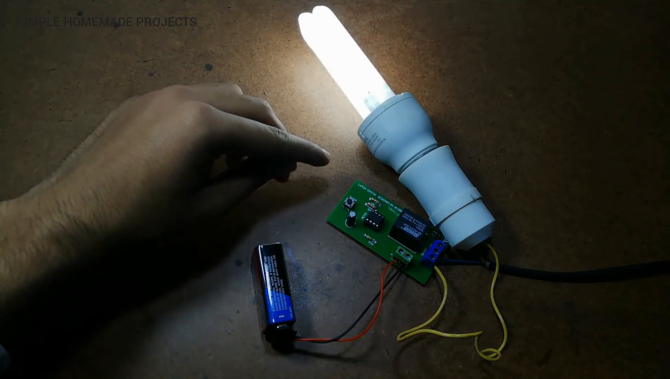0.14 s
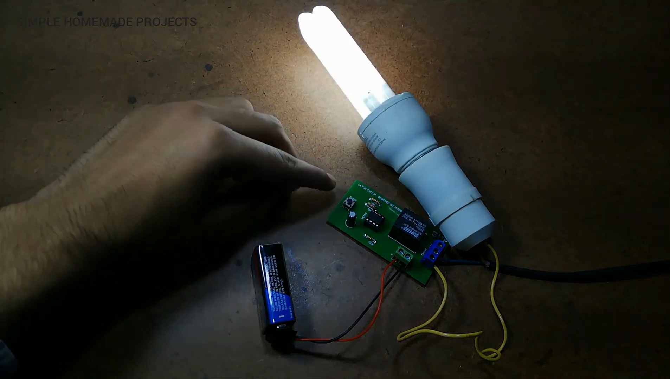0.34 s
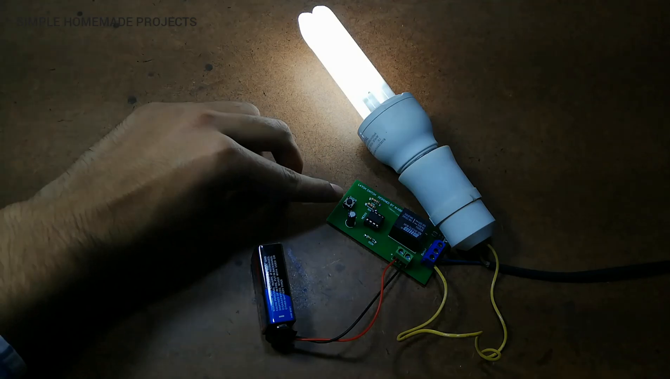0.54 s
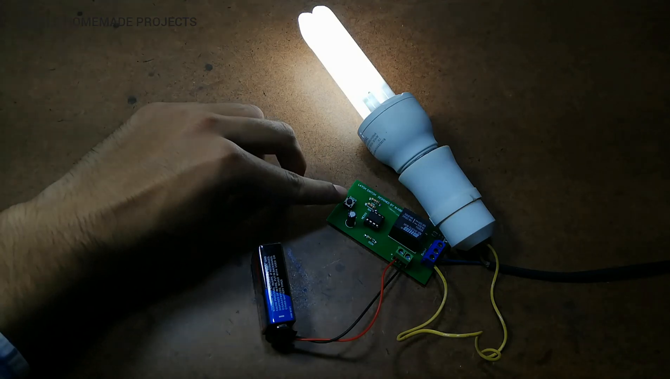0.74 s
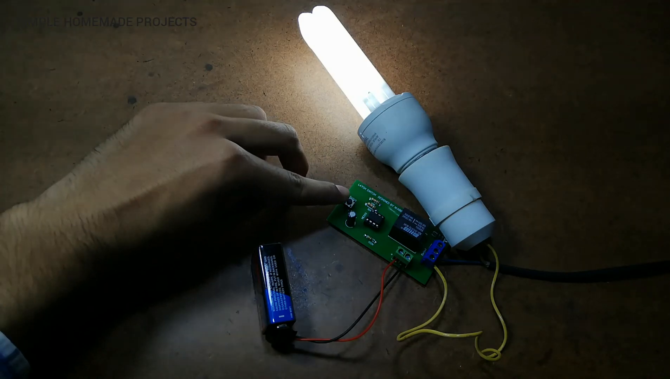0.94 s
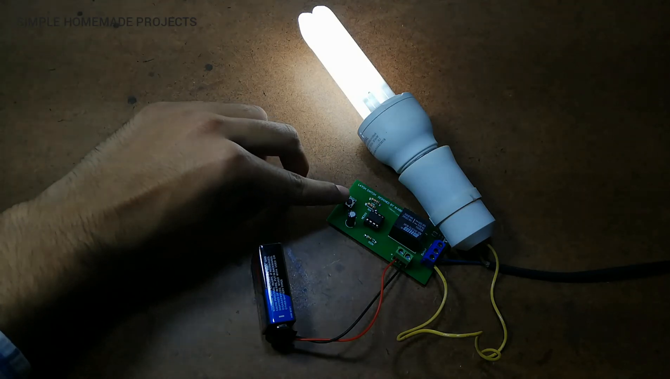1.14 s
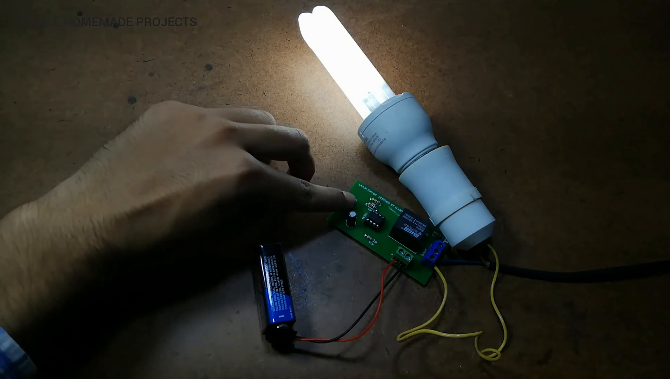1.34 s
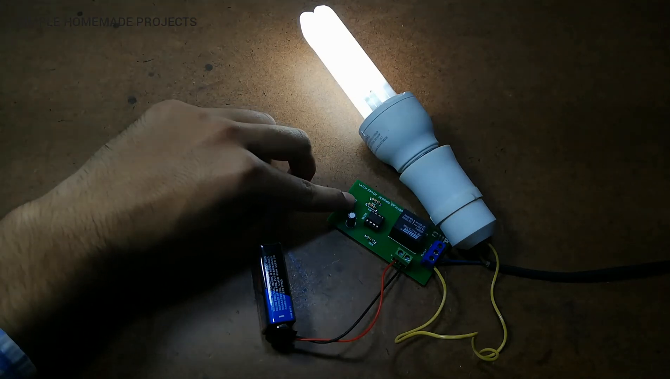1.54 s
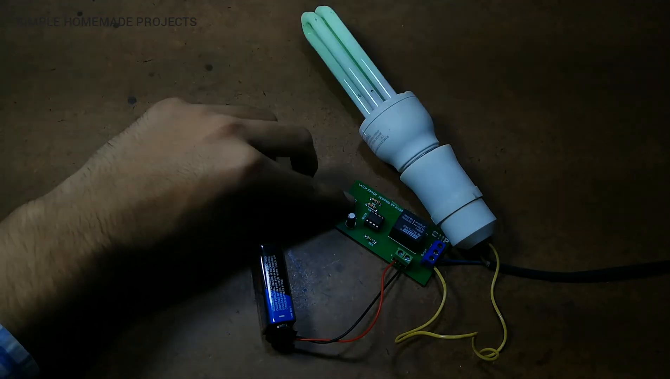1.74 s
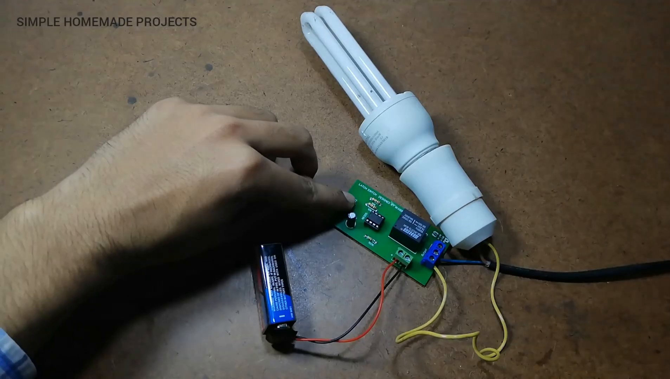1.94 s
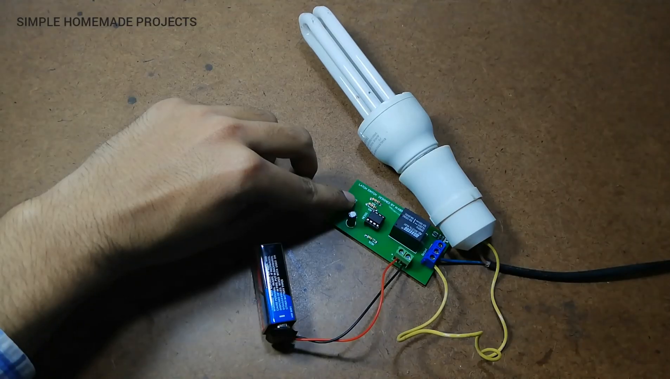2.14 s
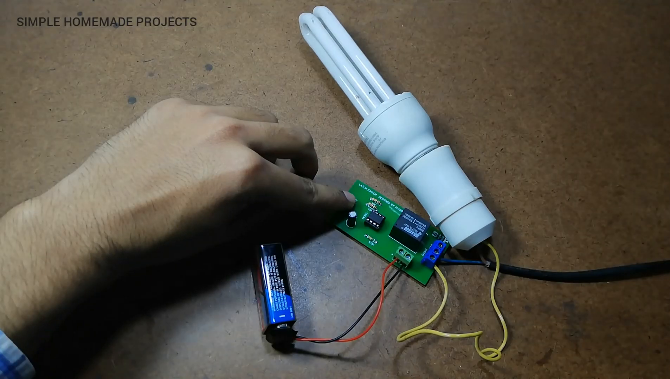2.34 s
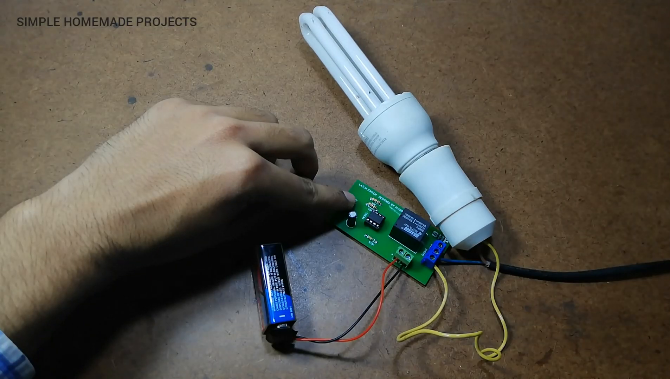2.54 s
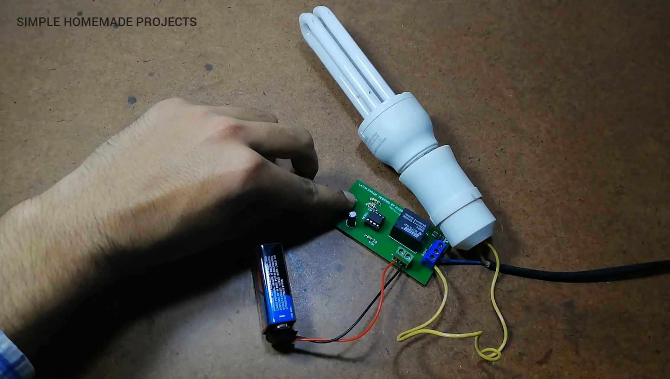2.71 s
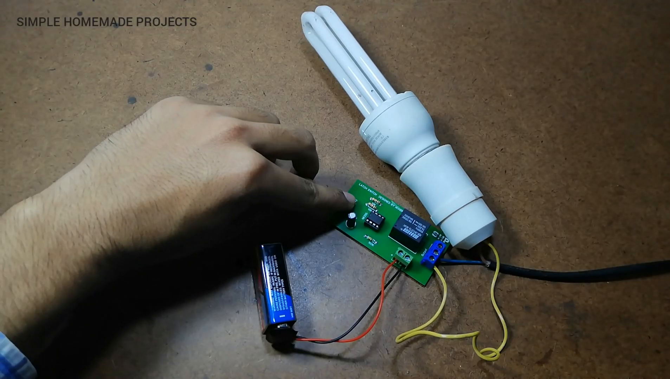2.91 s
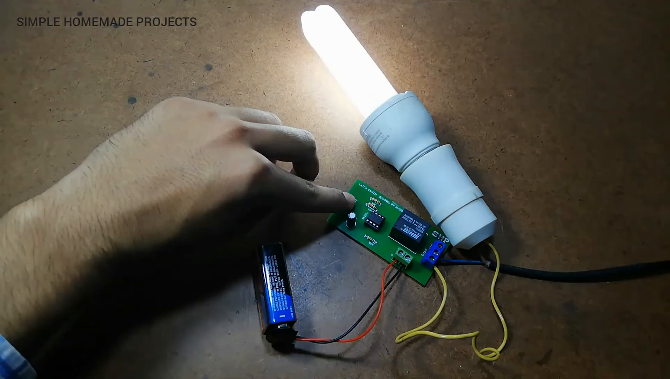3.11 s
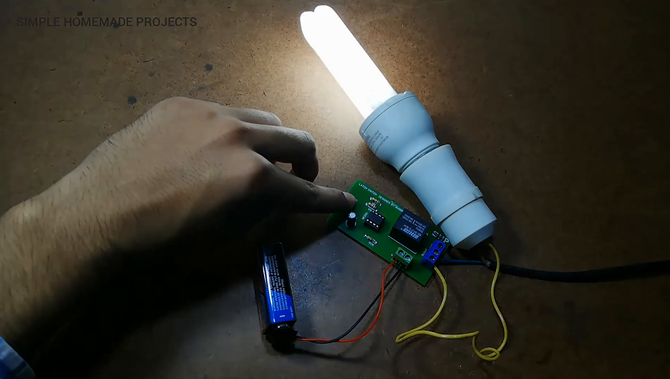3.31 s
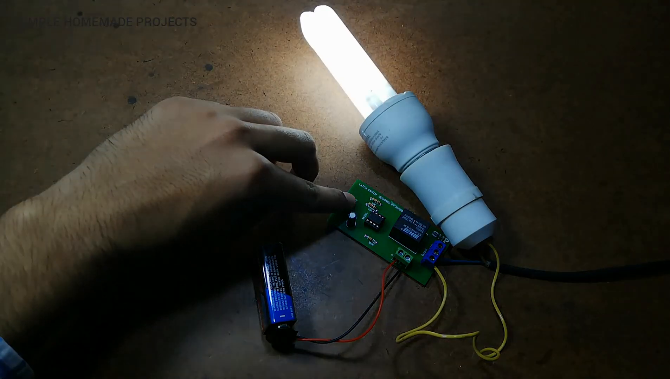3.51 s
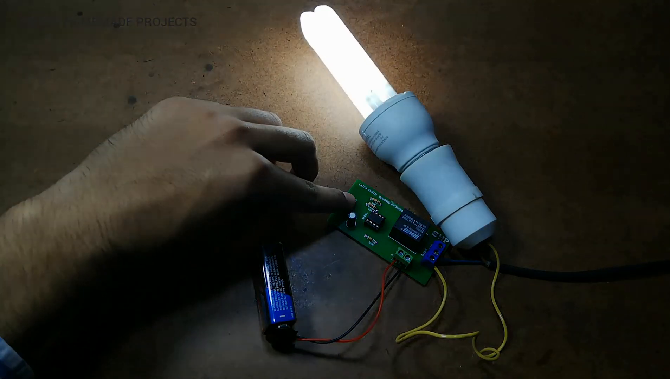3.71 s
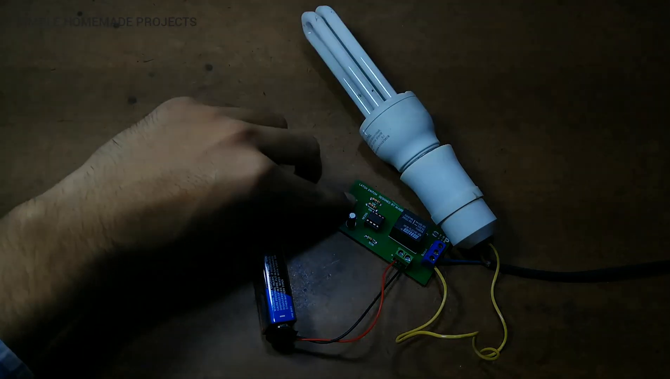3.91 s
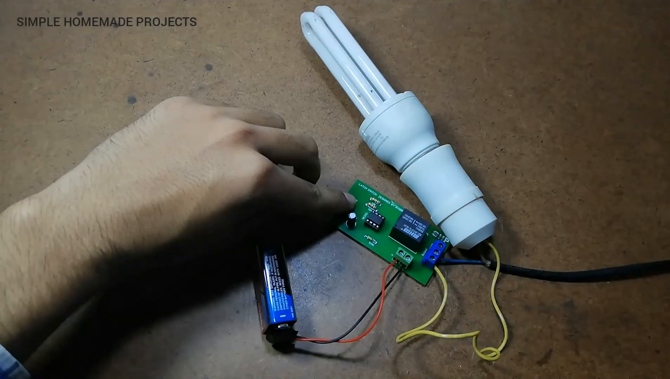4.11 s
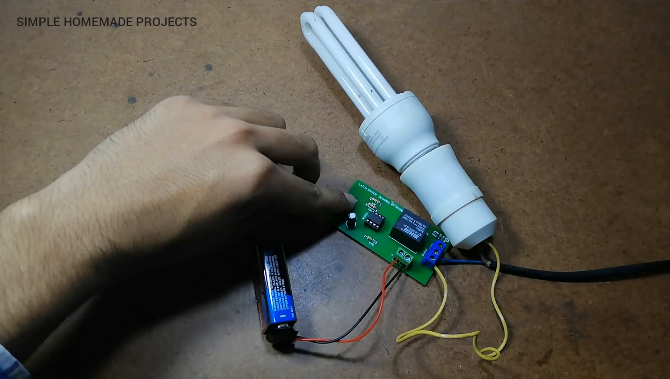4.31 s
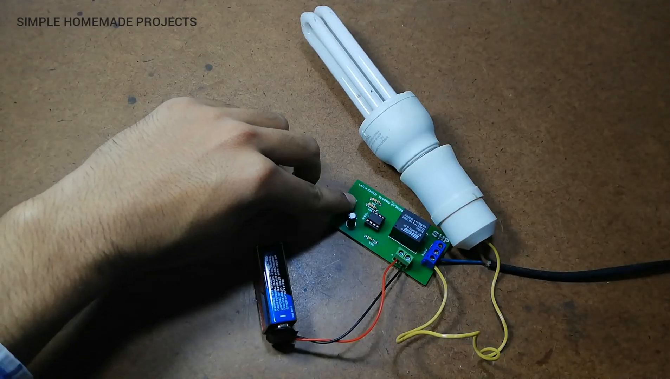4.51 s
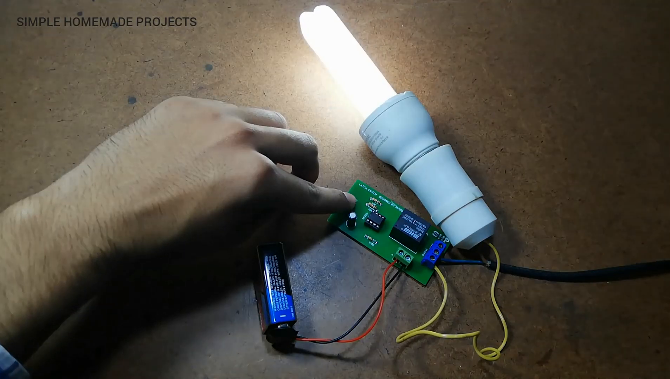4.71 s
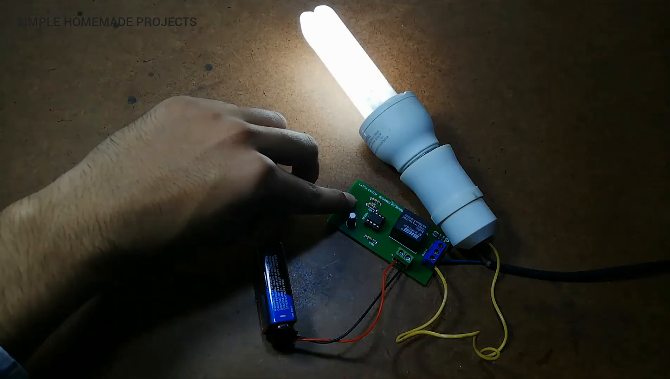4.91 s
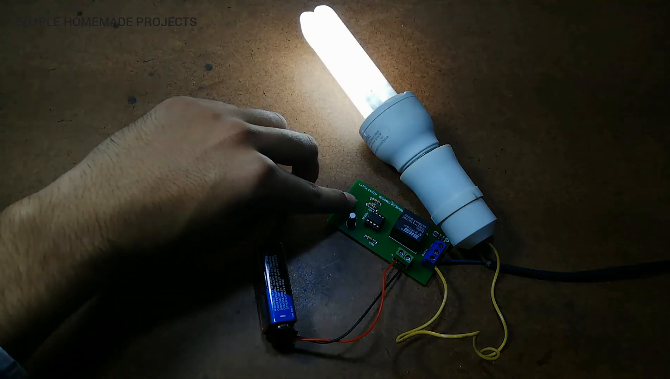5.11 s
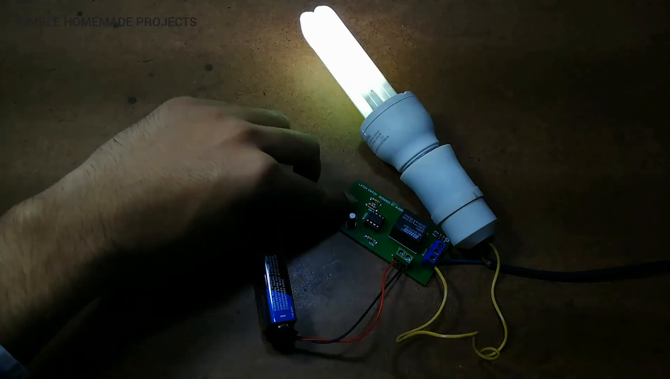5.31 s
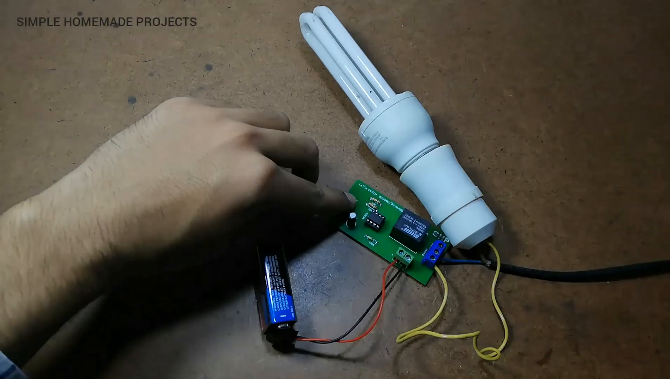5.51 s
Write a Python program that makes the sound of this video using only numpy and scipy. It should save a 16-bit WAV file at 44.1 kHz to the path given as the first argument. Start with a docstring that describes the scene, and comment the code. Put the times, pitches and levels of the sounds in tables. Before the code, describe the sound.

Close up in a small, hard-walled room, a relay gives five crisp, irregularly spaced clicks as a finger works a button on a circuit board. The clicks alternate between a slightly ringing metallic snap and a drier one, each trailed by a quiet button release and a short echo. Soft knocks of the board on a wooden table come before and between them, with faint hum, hiss and rustle underneath.

```python
"""In a small hard room, a finger works a push button on a circuit board lying on a wooden table.
The fingertip nudges the board with dull knocks, then presses five times, snapping the button's metal dome.
About 5 ms after each press a relay (a magnet-driven switch) clicks, by turns pulling in with a double
blow and dropping out with one; then the button springs back. The room rings after every click,
over a faint hum, hiss and swelling rustle."""
import sys
import numpy as np
from scipy import signal
from scipy.fft import rfft, irfft
from scipy.io import wavfile
from scipy.ndimage import uniform_filter1d

SR = 44100
rng = np.random.default_rng(int(sys.argv[2]) if len(sys.argv) > 2 else 0)


def waveform_to_disk(signal):
    """Save audio, clipped to [-1, 1], as 16-bit WAV at the path in sys.argv[1]."""
    frames = np.transpose(np.atleast_2d(signal))
    scaled = np.clip(frames, -1, 1) * 32767
    samples = np.round(scaled).astype(np.int16)
    wavfile.write(sys.argv[1], SR, samples)


N = 244755
T = np.arange(N) / SR

# tones of the board on the table: pitch_hz, level_db, ring_s, left_minus_right_db
BOARD_TONES = [(427, -21.5, 0.051, -2), (776, -7.5, 0.066, 5.5), (840, 0, 0.027, 4), (1008, 3, 0.021, 3),
               (1363, -11.5, 0.0084, -4), (2010, -21, 0.023, -3.5)]
# the table top's many short, crowded tones: pitch_hz, level_db
TABLE_COLOUR = [(100, -13.5), (300, -3.5), (550, -6), (850, -3), (1600, -3.5), (2400, -14), (3400, -22),
                (8000, -42.5)]
# the crowded tones of the small parts in button and relay: pitch_hz, level_db
PARTS_COLOUR = [(300, -24.5), (1500, -35.5), (3200, -40.5), (4400, -21.5), (6000, -6), (7500, 6.5),
                (10000, 0.5), (12000, -4), (13200, -17.5), (15000, -20), (16500, -26.5)]
# the finger's presses: down_s, up_s, release_knock_db, release_snap_db
BUTTON_PRESSES = [(1.6833, 1.872, -55, -52), (2.9444, 3.0883, -44.5, -39), (3.776, 3.924, -42, -60),
                  (4.478, 4.6021, -39, -41), (5.2456, 5.4207, -41, -39.5)]


def undb(db):
    """Turn decibels into a gain to multiply by."""
    return 10 ** (np.asarray(db) / 20)


def along(hz, points):
    """Read between (pitch_hz, value) points, with octaves evenly spaced."""
    pitches, values = np.transpose(points)
    return np.interp(np.log(hz + 1), np.log(pitches), values)


def noise(colour, size):
    """Unrelated left and right noises of strength 1, shaped by (pitch_hz, level_db) points."""
    gain = undb(along(np.arange(size // 2 + 1) * SR / size, colour))
    shaped = irfft(rfft(rng.standard_normal((2, size))) * gain, size)
    return shaped / shaped.std()


def drift(rate_hz):
    """A smooth random wander, mostly between -1 and 1."""
    hold = int(SR / rate_hz)
    steps = np.repeat(rng.standard_normal(N // hold + 1), hold)
    return 1.3 * uniform_filter1d(uniform_filter1d(steps, hold), hold)[:N]


def fade(t, ring_s):
    """Die away by 60 dB in ring_s seconds."""
    return np.exp(-np.log(1000) * t / ring_s)


def even_out(click):
    """Give a click the energy of 10 ms of sound at strength 1."""
    return click / np.sqrt(np.sum(click ** 2) / (2 * .01 * SR))


def add(out, start_s, sound):
    """Mix a sound into out at start_s."""
    i = max(int(round(start_s * SR)), 0)
    out[:, i:i + sound.shape[1]] += sound[:, :out.shape[1] - i]


def air():
    """Steady rumble and hiss; the low notes are alike left and right, the high ones are not."""
    # shape of the noise: pitch_hz, level_db
    colour = [(18, -22.5), (45, -6), (70, -9), (100, -6.5), (190, -11.5), (280, -18), (550, -26),
              (1200, -24), (2200, -28), (4400, -29), (7200, -32), (8700, -30.5), (9700, -28.5),
              (11200, -35), (16000, -41)]
    # how alike the two sides are: pitch_hz, likeness (0 to 1)
    likeness = [(60, 1), (200, 0.83), (600, 0.2), (1500, 0.14), (6000, 0.054)]
    mid, side = rfft(noise(colour, N))
    alike = np.clip(along(np.arange(len(mid)) * SR / N, likeness), 0, 1)
    mid, side = mid * np.sqrt((1 + alike) / 2), side * np.sqrt((1 - alike) / 2)
    return undb(-63) * irfft(np.array([mid + side, mid - side]), N)


def hum():
    """Three low tones waver in loudness and pitch."""
    # tones of the hum: pitch_hz, level_db, waver_db
    tones = [(49.4, -66, 2.5), (95, -72, 3), (200.2, -67.5, 0.5)]
    out = np.zeros(N)
    for hz, level_db, waver_db in tones:
        peak = np.sqrt(2) * undb(level_db + waver_db * np.tanh(drift(12)))
        out += peak * np.sin(2 * np.pi * hz * T + .35 * waver_db * drift(7.3))
    return out


def rustle(first_s=.045, every_s=.905, width_s=.055, peak_db=-67.5):
    """A faint rustle near 1.3 kHz swells at a steady beat."""
    # shape of the rustle: pitch_hz, level_db
    colour = [(500, -29.5), (1100, -7.5), (1310, -0.5), (1600, -9), (3000, -21.5), (8000, -41)]
    swells = sum(np.exp(-.5 * ((T - s) / width_s) ** 2) for s in np.arange(first_s, T[-1], every_s))
    return undb(peak_db) * swells * noise(colour, N)


def strike(tones, colour, crack_db, crack_s, rise_s, spread_rad, blows=((0, 0, 1),)):
    """A struck object rings with clear tones, while its crowded tones blur into a noisy crack."""
    t = T[:SR // 8]
    hz, level_db, ring_s, pan_db = np.transpose(tones)[:, :, None]
    side = np.array([.5, -.5])[:, None, None]
    # each tone reaches the two microphones out of step by spread_rad
    phase = rng.uniform(0, 2 * np.pi, hz.shape) + side * spread_rad * rng.choice([-1, 1], hz.shape)
    swing, rattle = 0, 0
    for delay_s, blow_db, ring_share in blows:
        age = np.maximum(t - delay_s, 0)
        contact = undb(blow_db) * (1 - np.exp(-age / rise_s)) ** 2
        swing = swing + contact * fade(age, ring_share * ring_s)
        rattle = rattle + contact * fade(age, crack_s)
    ring = np.sum(undb(level_db + side * pan_db) * swing * np.sin(2 * np.pi * hz * t + phase), axis=1)
    crack = noise(colour, len(t)) * rattle
    return even_out(even_out(ring) + undb(crack_db) * even_out(crack))


def fingertip():
    """The fingertip shifts the board on the table with flat, dull knocks."""
    # nudges of the board: start_s, level_db
    nudges = [(0.318, -63), (0.365, -67), (0.469, -69), (1.534, -65.5), (1.619, -61), (2.8379, -47.5),
              (5.3905, -43), (5.393, -48.5)]
    out = np.zeros((2, N))
    for start_s, level_db in nudges:
        knock = strike(BOARD_TONES, TABLE_COLOUR, crack_db=5, crack_s=.024, rise_s=.00035, spread_rad=.48)
        add(out, start_s, undb(level_db) * knock)
    return out


def room(source, build_s=.0087, late_s=.24):
    """The walls answer with a blurred echo that dies soonest in the highest treble."""
    # the room's echo: pitch_hz, level_db, ring_s
    bands = [(200, -5, 0.32), (887, -5, .42), (2030, -5, 0.36), (4490, -9.5, 0.48), (6896, -12.5, .41),
             (10000, -11, 0.43), (13200, -10, .3), (16000, -10.5, .25)]
    bands, t = np.array(bands), T[:SR * 3 // 4]
    hz, slice_s, slices = signal.stft(rng.standard_normal((2, 2, len(t))), SR, nperseg=256)
    level_db = along(hz, bands[:, [0, 1]])[:, None]
    ring_s = along(hz, bands[:, [0, 2]])[:, None]
    gain = undb(level_db) * np.sqrt(np.log(1000) / (ring_s * SR)) * fade(slice_s, ring_s)
    echo = signal.istft(slices * gain, SR)[1][..., :len(t)]
    echo *= 1 - np.exp(-(t / build_s) ** 2)
    echo *= np.exp(-(t / late_s) ** 3)  # the end falls away faster
    # both sides of the source reach both microphones
    return signal.fftconvolve(source[None], echo, axes=2).sum(axis=1)[:, :N]


def button(press_db=-46):
    """The metal dome snaps down and springs back, each time knocking the board against the table."""
    # tones of the dome: pitch_hz, level_db, ring_s, left_minus_right_db
    dome = [(4450, -3.5, 0.018, 6), (4850, -3, 0.0084, 5.5), (5832, -10, .01, -2), (7000, -0.5, 0.015, 2.5),
            (8000, 0.5, .013, 0), (9100, 1.5, .012, 0.5), (9544, -3, 0.025, 6), (10000, -4.5, .014, 0),
            (11000, -7.5, .016, -2.5), (14200, -14.5, .008, -9)]
    out = np.zeros((2, N))
    for down_s, up_s, up_knock_db, up_snap_db in BUTTON_PRESSES:
        # the dome always gives way at the same force, so only the releases vary in level
        for start_s, knock_db, snap_db in (down_s, press_db, press_db), (up_s, up_knock_db, up_snap_db):
            knock = strike(BOARD_TONES, TABLE_COLOUR,
                           crack_db=-6, crack_s=.039, rise_s=.0003, spread_rad=.41)
            snap = strike(dome, PARTS_COLOUR, crack_db=-5.5, crack_s=.014, rise_s=.0001, spread_rad=1.2)
            add(out, start_s, undb(knock_db) * knock + undb(snap_db) * snap)
    return out


def relay_pull_in(level_db, crack_db, travel_s=.0048):
    """On presses 1, 3 and 5 the magnet pulls an iron arm in: the contact hits, then the arm hits the core."""
    # tones of the closed relay, the long ones from its spring:
    # pitch_hz, level_db, ring_s, left_minus_right_db
    tones = [(475, -33, .02, 7.5), (780, -27.5, .02, 7.5), (878, -25, 0.034, 11.5), (966, -29, 0.16, 3),
             (4320, -21, 0.015, 4), (4950, -21, .009, 6.5), (5190, -9, 0.013, 5), (6220, -20.5, .014, 1.5),
             (6436, -15, 0.026, 4.5), (7220, -27, 0.088, -12), (6966, -5, .025, -0.5),
             (7000, -10.5, 0.04, -1), (7770, -9.5, 0.012, -1.5), (8230, -22.5, 0.083, -3.5),
             (8560, -10.5, .014, 14.5), (8100, -29.5, .08, 4.5), (9010, -5.5, 0.017, 11),
             (9036, -4.5, .015, 7.5), (9666, -8.5, 0.009, 10), (10120, 5.5, .017, 1),
             (10790, -2.5, 0.028, 3.5), (11000, -10, .035, -4), (11360, -6.5, 0.01, 0),
             (12340, -12, .012, -14), (14000, -17.5, 0.017, 2.5), (14750, -20.5, .016, 5.5)]
    # the two blows: delay_s, level_db, share_of_ring_time
    blows = [(0, 1, .38), (0.0024, 0, 1)]
    out = np.zeros((2, N))
    click = strike(tones, PARTS_COLOUR, crack_db, crack_s=.008, rise_s=.00027, spread_rad=1.4, blows=blows)
    for down_s, *_ in BUTTON_PRESSES[::2]:
        add(out, down_s + travel_s, undb(level_db) * click)
    return out


def relay_drop_out(level_db, crack_db, travel_s=.0052):
    """On presses 2 and 4 the spring throws the arm back against its stop in one blow."""
    # tones of the open relay: pitch_hz, level_db, ring_s, left_minus_right_db
    tones = [(940, -46.5, 0.0086, 6.5), (2020, -30, 0.0084, -4), (4450, -12.5, 0.0058, 2.5),
             (4730, -22.5, .01, 1.5), (5350, -19, 0.0055, -3), (7000, -12.5, 0.011, 3),
             (7240, -14.5, 0.011, 6), (7910, -19, 0.003, 9), (9540, -6.5, 0.0064, 2),
             (9480, -5.5, 0.015, 8), (9820, 0, 0.0061, 14), (11540, -3.5, 0.0056, -1.5),
             (12060, -19, .009, -15), (14000, -26.5, .011, 4)]
    out = np.zeros((2, N))
    for down_s, *_ in BUTTON_PRESSES[1::2]:
        click = strike(tones, PARTS_COLOUR, crack_db, crack_s=.014, rise_s=.00017, spread_rad=.71)
        add(out, down_s + travel_s, undb(level_db) * click)
    return out


def scene():
    """Clicks close to the microphones, their echo and the quiet room."""
    finger = button() + fingertip()
    near = finger + relay_pull_in(level_db=-16, crack_db=-6) + relay_drop_out(level_db=-15.5, crack_db=-10)
    to_walls = undb(-1) * finger  # the hand covers the button
    # sound from every face of the relay's case reaches the walls, so they get more crack
    to_walls += relay_pull_in(level_db=-14.5, crack_db=-1.9)
    to_walls += relay_drop_out(level_db=-15.5, crack_db=-5.9)
    return near + room(to_walls) + air() + hum() + rustle()


def record(dry):
    """Clip at full scale and cut the treble above 15.9 kHz."""
    treble_cut = signal.ellip(8, .2, 70, 15900, fs=SR, output="sos")
    return signal.sosfilt(treble_cut, np.clip(dry, -1, 1))


dry = scene()
out = record(dry)
waveform_to_disk(out)
```